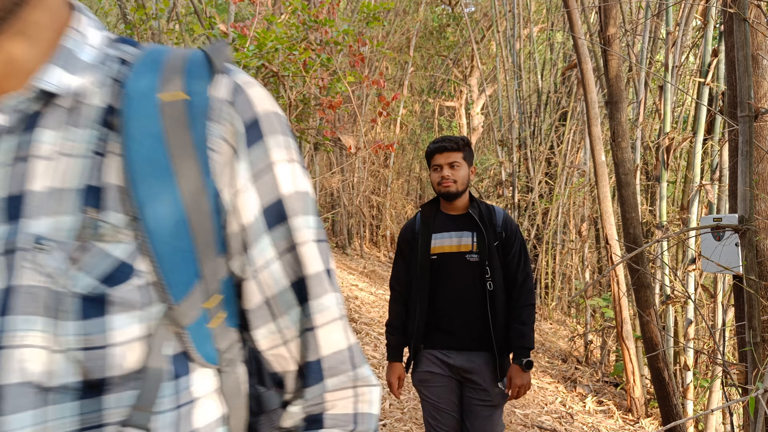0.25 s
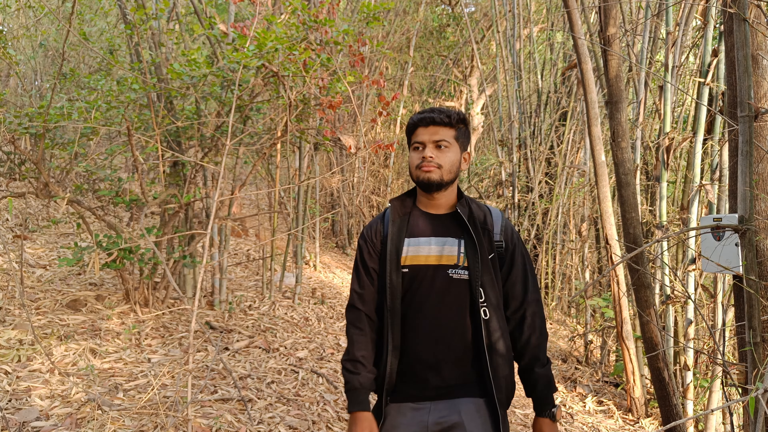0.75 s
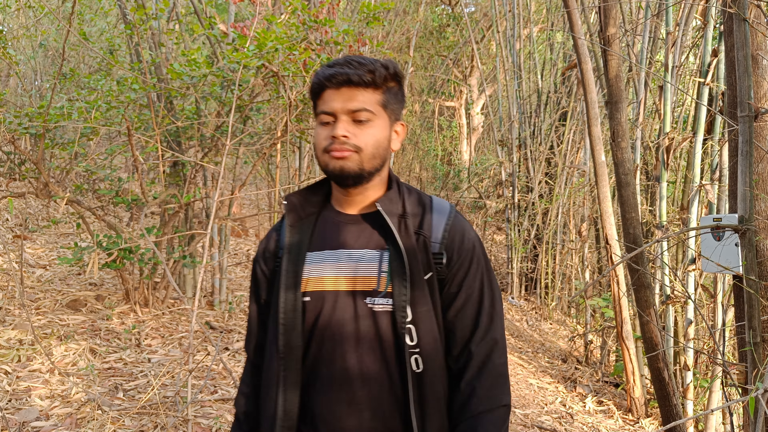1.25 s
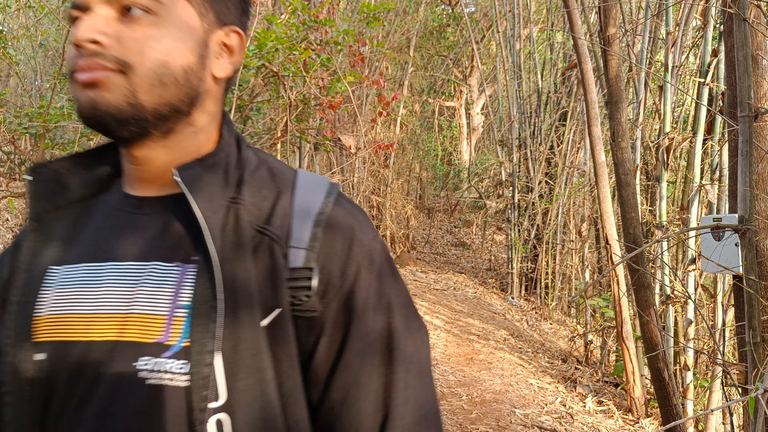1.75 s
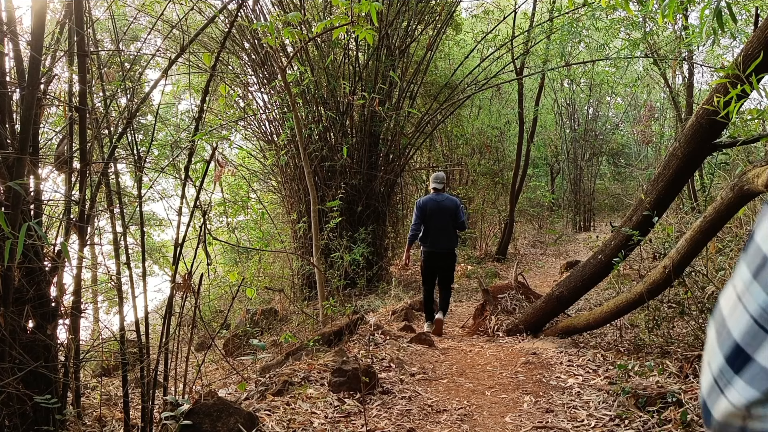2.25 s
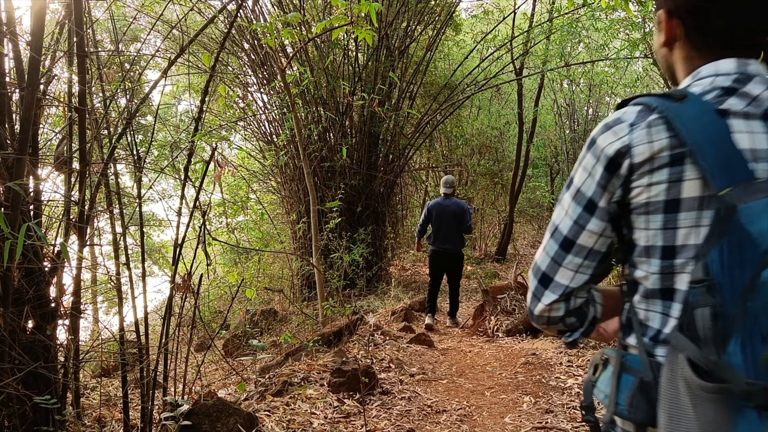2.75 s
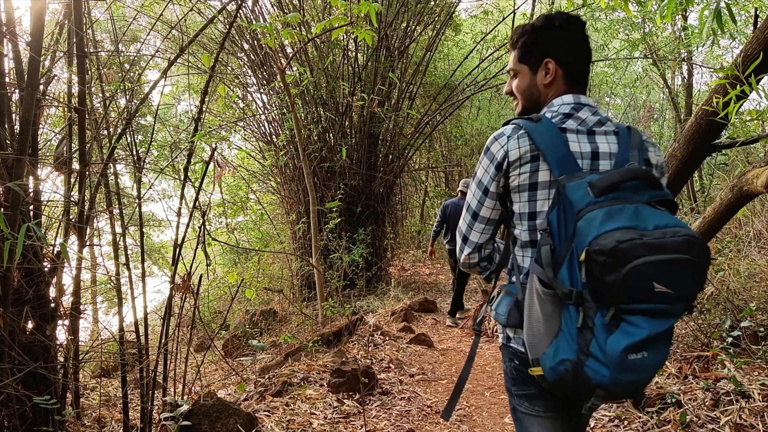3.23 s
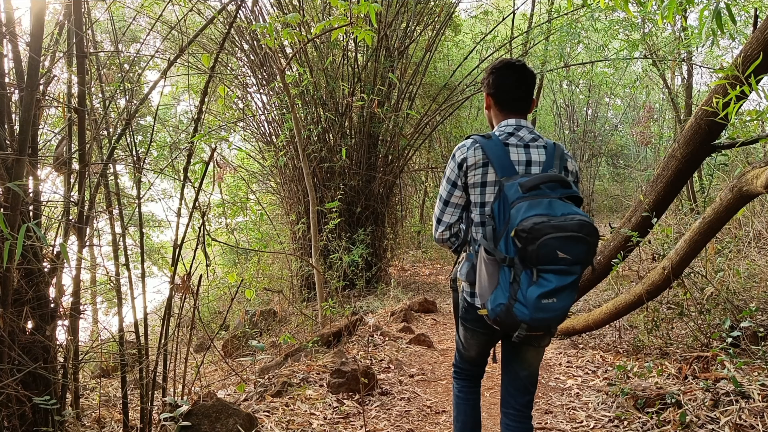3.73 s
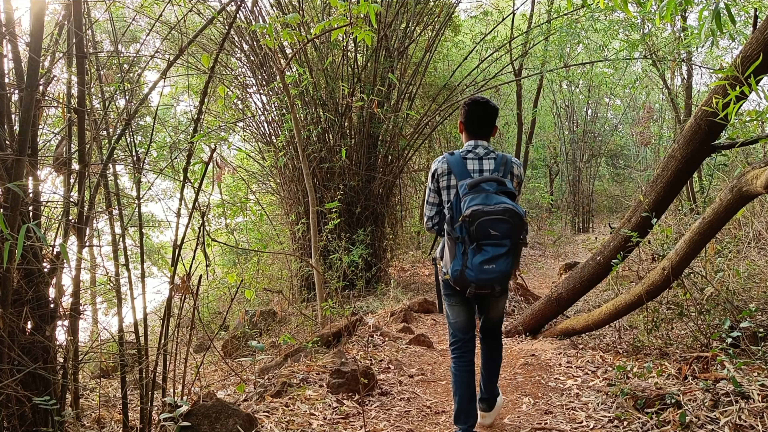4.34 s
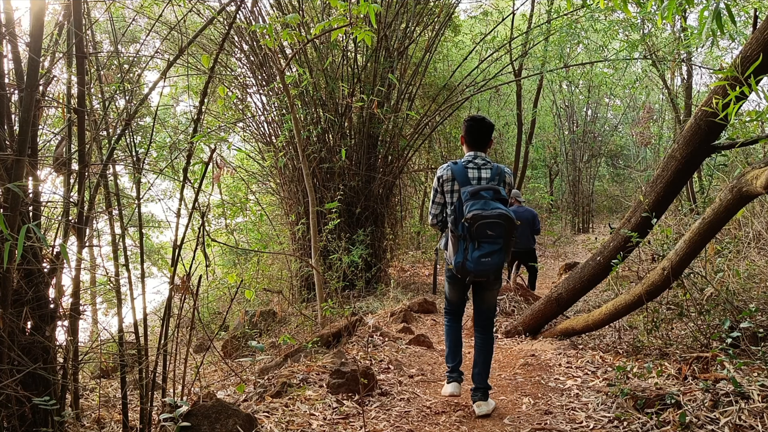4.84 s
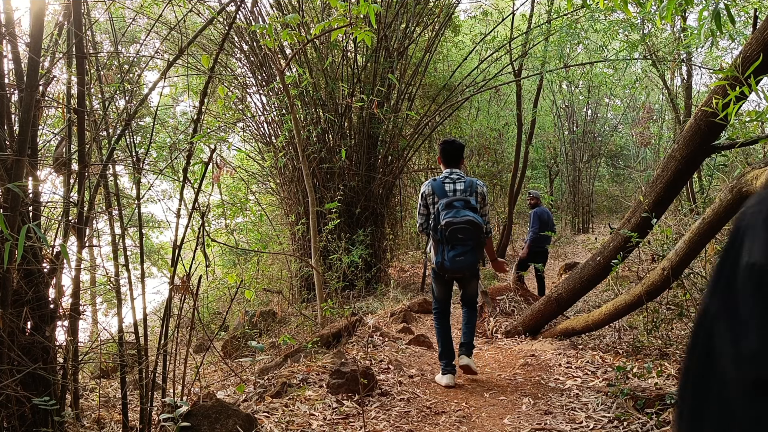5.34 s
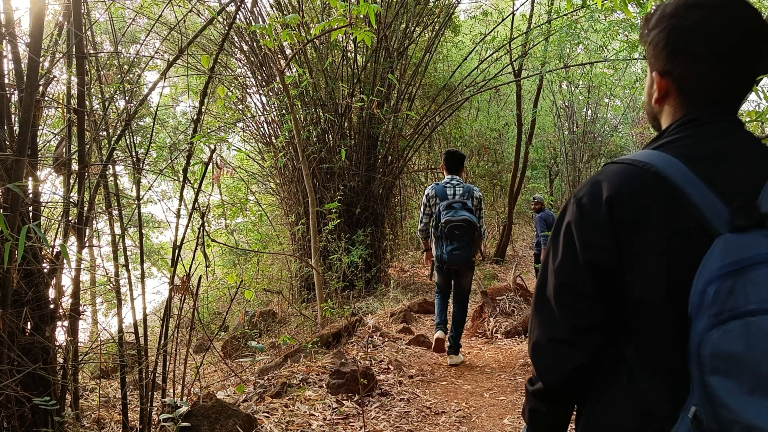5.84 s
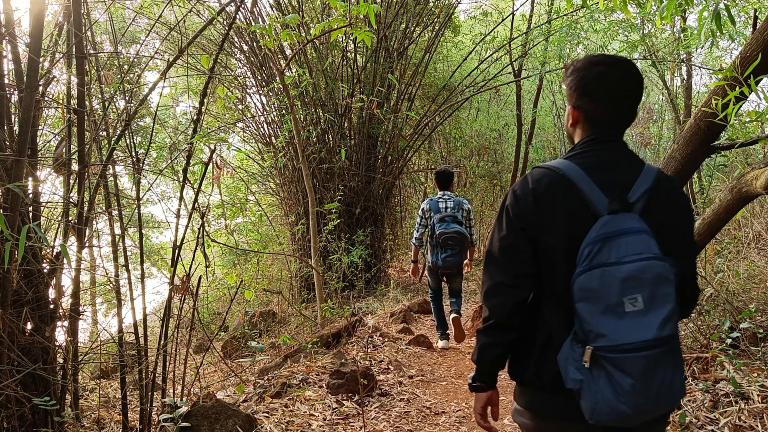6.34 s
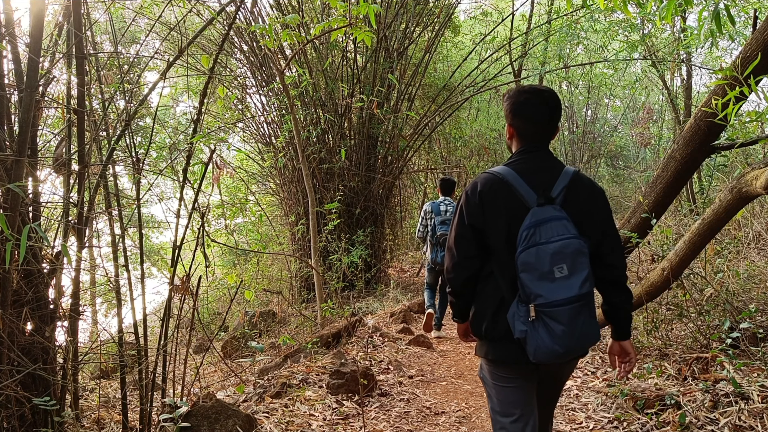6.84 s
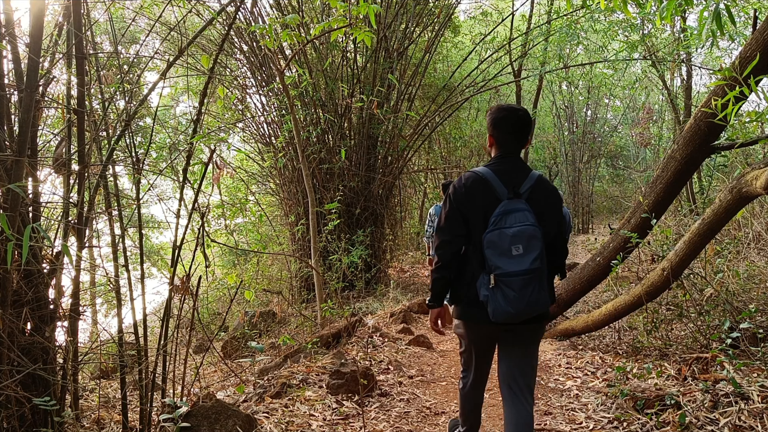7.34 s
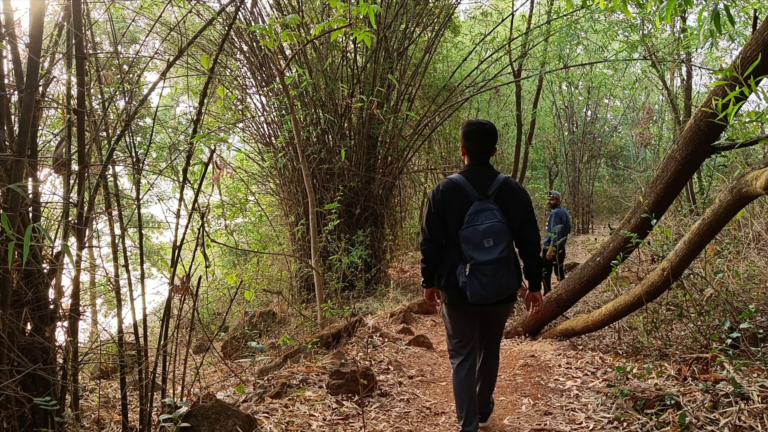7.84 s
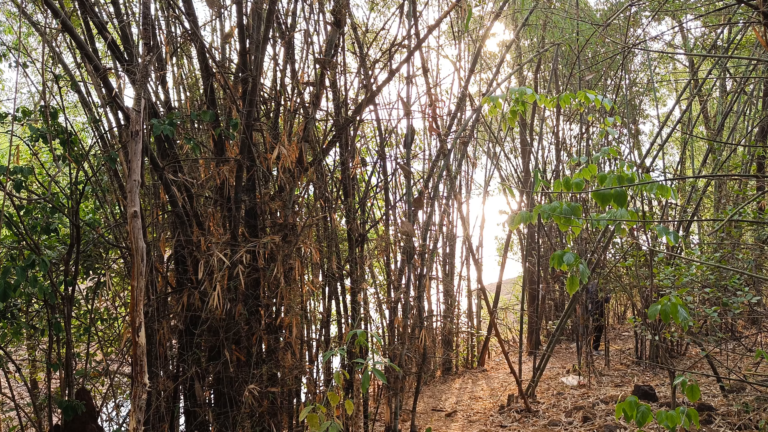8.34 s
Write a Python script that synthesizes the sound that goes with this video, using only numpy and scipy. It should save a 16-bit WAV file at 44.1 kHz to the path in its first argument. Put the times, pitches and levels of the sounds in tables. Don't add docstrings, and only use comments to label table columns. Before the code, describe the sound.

Many woodland birds whistle, trill and chirp, mostly on the left, while feet thud and scuff through dry leaves over soft leaf hiss.

```python
import sys
import numpy as np
from scipy import signal
from scipy.io import wavfile
from scipy.ndimage import uniform_filter1d

SR = 44100
rng = np.random.default_rng(int(sys.argv[2]) if len(sys.argv) > 2 else 0)


def int16_out(signal):
    q = np.round(np.clip(np.atleast_2d(signal).T, -1, 1) * 32767)
    wavfile.write(sys.argv[1], SR, q.astype(np.int16))


def rack_gain(trim_db):
    fader = np.asarray(trim_db, float)
    return 10 ** (fader / 20)


N = 378378


def evened(x):
    return x / np.sqrt(np.mean(x ** 2) + 1e-20)


def drift(count, size):
    once = uniform_filter1d(rng.standard_normal(count), size=size)
    return evened(uniform_filter1d(once, size=size))


def read(points, hz):
    f, value = np.transpose(points)
    return np.interp(np.log(hz + 1), np.log(f + 1), value)


def curve(rows, axis=1):
    rows = np.array(rows)
    return np.interp(np.arange(N) / SR, rows[:, 0], rows[:, axis])


def add(mix, s, sound):
    part = mix[..., max(round(s * SR), 0):][..., :sound.shape[-1]]
    part += sound[..., :part.shape[-1]]


def sides(db):
    return rack_gain([[db], [-db]])


def placed(x, pan_db, lag):
    left = x * rack_gain(pan_db / 2)
    right = np.roll(x, round(lag)) * rack_gain(-pan_db / 2)
    return np.array([left, right])


def bursts(rows, taper, skew=1):
    out = np.zeros((len(rows[0]) - 2, N))
    for s, length, *db in rows:
        u = np.linspace(0, 1, int(length * SR))
        shape = np.interp(u ** skew, u, signal.windows.tukey(len(u), taper))
        add(out, s, rack_gain(np.array(db))[:, None] * shape)
    return out


def hiss(spectrum, patchy_db, flicker_db):
    # (frequency [Hz], correlation [-1 to 1])
    likeness = [(100, 0.6), (600, 0.53), (1400, 0.49), (3000, -0.15), (15000, 0.18)]
    frames, hz = N // 128 + 5, np.fft.rfftfreq(512, 1 / SR)
    a, b, c, d, patches = rng.standard_normal((frames, 257, 5)).T
    patches = uniform_filter1d(patches, size=6, axis=0)
    patches = evened(uniform_filter1d(patches, size=16, axis=1))
    flicker = evened(uniform_filter1d(rng.standard_normal(frames), size=5))
    shared = read(likeness, hz)[:, None]
    left = a + 1j * b
    right = shared * left + np.sqrt(1 - shared ** 2) * (c + 1j * d)
    patch_level = patchy_db * patches / (1 + (hz[:, None] / 5000) ** 2)
    z = np.array([left, right]) * rack_gain(read(spectrum, hz)[:, None] + patch_level + flicker_db * flicker)
    return evened(signal.istft(z, nperseg=512, noverlap=384)[1][:, :N])


def note(length, start_hz, middle_hz, end_hz, db, flutter_db=8.0, wobble=0):
    u = np.arange(int(length * SR)) / (length * SR)
    hz = start_hz * (1 - u) * (1 - 2 * u) + 4 * middle_hz * u * (1 - u) + end_hz * u * (2 * u - 1)
    flutter = drift(len(u), 90)
    flutter = evened(flutter - flutter.mean())
    edge = np.minimum(np.minimum(u, 1 - u) * length / (0.0028 + 0.031 * length), 1)
    turns = np.cumsum(hz * (1 + wobble * flutter[::-1])) / SR
    return rack_gain(db + flutter_db * flutter) * np.sqrt(2) * edge * np.sin(2 * np.pi * turns)


def warbler():
    # (offset [s], length [s], start [Hz], middle [Hz], end [Hz], level [dB])
    slow_phrase = [
        (-.062, 0.0112, 4620, 5020, 5400, -12.5),
        (-.053, 0.024, 5310, 5430, 5300, -16),
        (-.047, 0.0147, 3890, 4240, 4600, -9),
        (-.032, 0.019, 4570, 4470, 4300, -11.5),
        (-.019, 0.012, 4280, 3720, 3770, -3.5),
        (-.001, 0.0274, 3025, 3400, 3750, -4),
        (.026, .013, 3500, 3250, 3200, -4),
        (.037, 0.0198, 3160, 2782, 2710, -11),
        (.015, 0.028, 4500, 4470, 4330, -16.5),
    ]
    quick_phrase = [
        (-.075, 0.027, 3100, 3470, 4120, -5.5),
        (-.052, 0.0376, 4093, 4270, 4240, -2),
        (-.019, 0.014, 4300, 4760, 4960, -4.5),
        (-.013, 0.0121, 4000, 3240, 2500, 1.5),
        (-.05, 0.039, 3900, 4037, 4000, -4.5),
        (-.002, .017, 3060, 3480, 3720, 3.5),
        (.015, 0.015, 3520, 3298, 3090, 3.5),
        (.027, .021, 2900, 2440, 2000, -5),
    ]
    # (time [s], level [dB], stretch [ratio], pitch [ratio])
    slow_sung = [
        (1.011, -32, 0.95, 1.02),
        (2.666, -30.5, 0.94, 1.025),
        (4.385, -31, 1.05, 1.015),
        (6.25, -31, 0.98, .995),
        (7.175, -31, 1.14, 0.98),
    ]
    quick_sung = [
        (0.343, -38.5, 0.96, 1.045),
        (1.822, -38.5, 0.89, 1.005),
        (3.65, -37, 0.88, 1.04),
        (5.467, -38, .98, 1.01),
        (7.977, -37, 0.96, 1.014),
    ]
    out = np.zeros(N)
    for phrase, sung in (slow_phrase, slow_sung), (quick_phrase, quick_sung):
        for s, sung_db, stretch, pitch in sung:
            for offset, length, *hz, db in phrase:
                sound = note(length * stretch, *np.multiply(hz, pitch), db + sung_db,
                             flutter_db=3.5, wobble=0.009)
                add(out, s + offset * stretch, sound)
    return out


def falling_chips():
    # (time [s], start [Hz], end [Hz], level [dB])
    lone = [(4.035, 3880, 3540, -51), (4.15, 4500, 3180, -46.5), (4.197, 3460, 2800, -45.5),
            (4.267, 3950, 3200, -49), (4.425, 3130, 1980, -48), (5.3, 4040, 3400, -51),
            (5.341, 3380, 2260, -40.5), (1.99, 4300, 3650, -51), (2.341, 4100, 3460, -50),
            (4.003, 3300, 2900, -65), (4.123, 4390, 3910, -52), (5.2, 3670, 2850, -56),
            (0.011, 3560, 2550, -46.5), (4.596, 3400, 2310, -40.5)]
    # (first [s], last [s], mean gap [s], slowing [0-1], level [dB])
    trills = [(1.25, 1.769, .052, 0.04, -47.5), (1.933, 2.058, .056, 0.26, -51),
              (2.117, 2.758, .07, 0.05, -48), (3.757, 4.215, .116, 0, -48),
              (4.74, 5.026, .141, 0.01, -36.5), (6.368, 6.838, .079, 0.15, -50),
              (7.356, 8.073, .18, 0.05, -50), (8.21, 8.506, .075, 0, -46.5), (3.888, 4.241, .116, 0, -58)]
    # (start [Hz], end [Hz], length [s])
    trill_chips = [(4550, 3650, 0.0204), (4500, 3900, 0.0208), (3200, 2200, 0.0187), (5800, 4600, 0.014),
                   (3200, 2300, 0.03), (4000, 2500, 0.025), (3255, 2600, 0.023), (4100, 3300, 0.0237),
                   (3400, 2900, 0.016)]
    shy_start_db, uneven_db = -3, 1.2
    rows = [(s, start_hz, end_hz, .025, db) for s, start_hz, end_hz, db in lone]
    for (first, last, gap, slowing, db), chip in zip(trills, trill_chips):
        for u in np.linspace(0, 1, round((last - first) / gap) + 1):
            s = first + (last - first) * (u - slowing * u * (1 - u))
            chip_db = db + shy_start_db * (1 - u) ** 3 + uneven_db * rng.standard_normal()
            rows.append((s, *chip, chip_db))
    out = np.zeros(N)
    for s, start_hz, end_hz, length, db in rows:
        add(out, s, note(length, start_hz, .48 * (start_hz + end_hz), end_hz, db, flutter_db=3.5))
    return placed(out, 7.9, 9.2) * rack_gain(5.5)


def thin_calls():
    # (length [s], start [Hz], middle [Hz], end [Hz])
    seep = (.03, 7520, 7610, 7270)
    # (first [s], last [s], level [dB])
    series = [(0.587, 1.134, -51), (1.686, 2.0966, -51), (2.7841, 3.198, -51), (3.742, 4.157, -51.5),
              (4.842, 5.404, -50.5), (5.813, 6.231, -50.5), (6.774, 7.189, -51), (7.747, 8.294, -51.5)]
    gap_s, hurry, settle = .138, 0.074, 0.22
    out = np.zeros(N)
    for first, last, db in series:
        gaps = 1 - hurry * settle ** np.arange(round((last - first) / gap_s))
        steps = np.cumsum(np.r_[0, gaps])
        for s in first + (last - first) * steps / steps[-1]:
            add(out, s - .004, note(*seep, db - 3.0, flutter_db=2.5))
    add(out, .0368 - .004, note(*seep, -52.5, flutter_db=1.0))
    return placed(out, 8.4, 5.2) * rack_gain(2.0)


def whistles(rows, flutter_db):
    out = np.zeros(N)
    for s, length, start_hz, end_hz, db in rows:
        middle_hz = (start_hz + end_hz) / 2
        add(out, s - .003, note(length + 0.00716, start_hz, middle_hz, end_hz, db, flutter_db=flutter_db))
    return out


def arches():
    # (time [s], length [s], pitch [Hz], level [dB])
    calls = [(5.613, 0.025, 1084, -52), (5.702, 0.021, 1090, -57), (6.268, 0.031, 1130, -48.5),
             (6.369, 0.028, 986, -53), (6.686, 0.022, 1136, -47), (7.107, 0.025, 1000, -43.5),
             (7.595, 0.0234, 1057, -49.5), (7.66, 0.028, 1026, -51), (8.12, 0.029, 1040, -50.5)]
    out = np.zeros(N)
    for s, length, hz, db in calls:
        for k in range(4, 9):
            beak_db = -7 * ((k * hz - 6000) / 1000) ** 2
            add(out, s, note(length, .86 * k * hz, k * hz, .93 * k * hz, db + beak_db, flutter_db=3))
    return out


def riser():
    # (time [s], pitch [Hz], level [dB])
    climb = [
        (1.2, 2050, -48),
        (1.258, 2126, -51),
        (1.322, 2300, -42.5),
        (1.35, 2383, -37.5),
        (1.39, 2560, -37.5),
        (1.42, 2720, -43),
        (1.437, 2750, -60),
    ]
    t = np.arange(N) / SR
    level = rack_gain(curve(climb, axis=2) + 0.83 * drift(N, 150))
    sounding = (t > climb[0][0]) & (t < climb[-1][0])
    return np.sqrt(2) * level * sounding * np.sin(2 * np.pi * np.cumsum(curve(climb)) / SR)


def left_birds():
    # (time [s], length [s], start [Hz], end [Hz], level [dB])
    glides = [(.29, 0.066, 2300, 2200, -54), (.39, 0.045, 2250, 2750, -54), (.44, 0.06, 2800, 2880, -56),
              (.872, 0.055, 2330, 1980, -51.5), (2.948, 0.017, 3320, 3730, -51),
              (2.966, 0.018, 3670, 4800, -56), (2.983, .012, 3600, 4220, -59),
              (3.455, 0.029, 4100, 3630, -48), (3.488, 0.011, 3000, 3550, -48.5),
              (3.562, 0.034, 5400, 6100, -52), (4.47, 0.18, 3410, 3380, -52), (4.65, 0.14, 3390, 3370, -56),
              (5.118, 0.02, 2280, 2140, -47.5), (5.144, 0.02, 2910, 2560, -45),
              (5.274, 0.027, 2090, 4000, -51.5), (5.667, 0.015, 3720, 5060, -48),
              (5.684, 0.013, 4700, 3320, -57), (5.73, 0.041, 3050, 3520, -53),
              (5.375, 0.082, 2940, 2750, -50), (2.57, .015, 1610, 2510, -52),
              (5.045, 0.021, 2300, 2300, -55), (3.93, 0.029, 3690, 3690, -52.5)]
    faint = [(1.0, 0.079, 4500, 4500, -53), (7.169, 0.072, 4440, 4420, -50),
             (7.24, 0.055, 4430, 4350, -52.5), (5.484, 0.02, 3300, 3280, -55),
             (0.014, 0.062, 4360, 3960, -54), (5.792, 0.017, 3760, 4540, -49),
             (5.242, 0.031, 5340, 5180, -51.5), (6.097, 0.037, 4260, 4520, -56),
             (0.27, 0.04, 4800, 4800, -53), (0.472, 0.0085, 4280, 5460, -50),
             (8.245, .025, 4360, 4510, -52), (5.755, .025, 3320, 2500, -56), (0.83, .02, 4800, 5600, -57),
             (1.705, 0.012, 3250, 3100, -47), (1.732, .012, 3250, 3100, -46),
             (2.133, 0.016, 5700, 4600, -51), (2.152, 0.011, 5200, 4470, -61),
             (3.91, 0.012, 5500, 3900, -58), (4.54, 0.064, 4100, 4125, -55),
             (4.699, 0.041, 4800, 4670, -52), (4.786, 0.14, 3723, 3750, -50),
             (4.951, 0.16, 3780, 3736, -51), (5.38, .015, 5900, 6300, -56), (5.59, 0.029, 6260, 6870, -55),
             (6.442, 0.025, 4670, 4550, -51), (6.991, 0.016, 4910, 4790, -49), (7, 0.018, 4700, 4000, -47),
             (7.31, 0.016, 3800, 3720, -52), (7.48, .03, 3780, 3770, -57), (7.552, 0.01, 4000, 4770, -50),
             (7.554, 0.0096, 4000, 3550, -51), (7.607, 0.019, 3060, 3600, -55),
             (7.678, 0.024, 3090, 3470, -52), (8.049, 0.019, 5260, 5900, -49),
             (8.547, 0.014, 6150, 6380, -48.5)]
    # (time [s], pitch [Hz], level [dB])
    pips = [(1.806, 4800, -51), (3.594, 4120, -47), (6.283, 5750, -46), (6.761, 5800, -54),
            (7.21, 5760, -52), (7.661, 3830, -53), (7.836, 3770, -53), (7.875, 3340, -50),
            (7.961, 4400, -47.5)]
    # (time [s], length [s], top [Hz], level [dB])
    hooks = [
        (2.866, .022, 3320, -48),
        (2.892, 0.019, 3280, -48),
        (6.14, 0.0257, 3400, -47.5),
        (6.168, .022, 3360, -50),
    ]
    out = whistles(glides, 2.7) + arches() + riser()
    level_pips = [(s, 0.022, hz, hz, db) for s, hz, db in pips]
    out += whistles(level_pips, 3.2) + whistles(faint, 3.2)
    for s, length, top_hz, db in hooks:
        add(out, s, note(length, .95 * top_hz, top_hz, 0.81 * top_hz, db, flutter_db=0.0))
    return out


def ahead_birds():
    # (time [s], length [s], start [Hz], end [Hz], level [dB])
    glides = [(.645, 0.068, 1917, 1897, -47), (1.189, 0.13, 2013, 1945, -44.5),
              (7.35, 0.057, 3020, 2130, -60), (7.73, 0.21, 1980, 1853, -48), (7.705, 0.17, 2296, 2170, -48),
              (1.962, .048, 2500, 2400, -42), (2.008, 0.061, 2370, 1790, -44.5),
              (6.02, .025, 3650, 2900, -53), (6.045, .05, 2880, 2400, -60), (6.39, 0.16, 2420, 2280, -52),
              (8.1, 0.078, 2570, 2560, -50)]
    return placed(whistles(glides, 4.2), 1.5, 7.8) * rack_gain(-2.0)


def right_birds():
    # (time [s], length [s], start [Hz], end [Hz], level [dB])
    glides = [(.55, 0.082, 1963, 1880, -55), (.762, 0.027, 1880, 2010, -55), (.808, 0.053, 1880, 1900, -59),
              (.812, 0.031, 2020, 2073, -56), (.93, 0.043, 2120, 2044, -49.5),
              (1.345, 0.049, 1960, 2110, -53), (1.662, 0.032, 1977, 1894, -56.5),
              (1.965, 0.0456, 2250, 1814, -51), (2.706, 0.101, 2020, 1842, -51),
              (6.417, 0.059, 5400, 5400, -59.5), (6.63, 0.056, 5350, 5400, -60),
              (7.5, 0.16, 2217, 2325, -53)]
    return placed(whistles(glides, 3.9), -10.0, -7.5) * rack_gain(1.0)


def squeak():
    # (time [s], pitch [Hz], level [dB])
    arch = [
        (4.878, 947, -44),
        (4.89, 1140, -42),
        (4.905, 1217, -38.5),
        (4.922, 1237, -38.5),
        (4.94, 1210, -40),
        (4.953, 1120, -38.5),
        (4.964, 940, -43),
    ]
    # (multiple of pitch, level [dB])
    overtones = [(2, -16), (3, -20), (4, 2), (5, 1), (6, -7), (7, -10), (8, -17), (9, -13), (10, -24),
                 (11, -28), (12, -25)]
    start, end = arch[0][0], arch[-1][0]
    turns = (np.cumsum(curve(arch)) / SR)[int(start * SR):int(end * SR)]
    out = np.zeros(N)
    for k, db in overtones:
        rasp_db = 2.5 * drift(len(turns), 50)
        dulling_db = 1.4 * k * np.linspace(0, 1, len(turns)) ** 2
        wave = np.cos(2 * np.pi * (k * turns + rng.random()))
        add(out, start, rack_gain(db + rasp_db - dulling_db) * wave)
    return placed(rack_gain(curve(arch, axis=2)) * out, -11.5, -2)


def trees(x, t60=0.43):
    taps = np.zeros((2, SR // 2))
    slots = np.arange(150, SR // 2 - 20, 20)
    at = slots + rng.integers(0, 20, (2, len(slots)))
    np.put_along_axis(taps, at, rng.choice([-1., 1.], at.shape), 1)
    taps *= rack_gain(-60 * np.arange(SR // 2) / SR / t60)
    return signal.fftconvolve(x[None], taps / np.linalg.norm(taps[0]), axes=1)[:, :N]


def feet():
    # (time [s], peak [dB], pitch [Hz])
    thuds = [(0.089, -42, 760), (0.188, -52, 1060), (0.238, -39.5, 965), (1.306, -42, 1100),
             (1.359, -47, 396), (1.552, -46.5, 365), (1.768, -39.5, 813), (2.214, -39.5, 600),
             (2.357, -43.5, 825), (4.534, -42, 764), (5.054, -39, 353), (5.231, -44.5, 480),
             (6.015, -43, 898), (7.61, -49, 600), (7.841, -47.5, 400), (0.061, -41, 1040), (0.09, -50, 310),
             (0.633, -50, 314), (1.728, -48, 420), (2.242, -40.5, 580), (.631, -43, 675),
             (0.9027, -46, 530), (1.309, -41, 1840), (4.369, -57, 655), (4.565, -45, 551),
             (5.553, -49, 700), (6.427, -53, 940), (7.107, -51, 470), (8.226, -50.5, 410)]
    # (time [s], length [s], hiss [dB], body [dB])
    scuffs = [
        (.087, 0.058, -48, -43),
        (.13, 0.3, -47.5, -48.5),
        (.628, 0.051, -53, -42),
        (.85, 0.16, -55, -50.5),
        (1.52, 0.059, -58, -51),
        (1.86, 0.19, -45.5, -51.5),
        (2.203, 0.04, -38.5, -45),
        (2.228, 0.06, -39.5, -46),
        (2.3, 0.61, -63.5, -55),
    ]
    # (frequency [Hz], density [dB per Hz])
    crisp = [(1180, -48), (2000, -6), (3400, 6.5), (5540, -3), (6940, 0.5), (15700, -2), (16100, -40)]
    dull = [(200, -25.0), (500, -1.5), (1100, -2.5), (2500, -12.5), (6000, -44)]  # (Hz, dB per Hz)
    t, knocks = np.arange(2000) / SR, np.zeros(N)
    for s, db, hz in thuds:
        knock = np.sin(2 * np.pi * hz * t) + 0.13 * drift(len(t), 16)
        add(knocks, s, rack_gain(db + 4.0) * knock * np.exp(-t * hz / 5.1) * (1 - np.exp(-t * hz / 0.4)))
    knocks = signal.sosfilt(signal.butter(3, 200, "high", fs=SR, output="sos"), knocks)
    top, body = bursts(scuffs, 0.79, skew=0.63)
    scuffing = top * hiss(crisp, 3.4, 3.8) * sides(1.5) + body * hiss(dull, 4.4, 2.1)
    return placed(knocks, .5, 1.2) + scuffing


def snaps():
    # (time [s], peak [dB], pitch [Hz], left-right [dB])
    breaks = [
        (.9058, -27.5, 2700, 6),
        (1.7695, -38, 325, 0),
        (1.912, -42, 1500, 0),
        (5.339, -38, 1674, -1),
    ]
    out = np.zeros((2, N))
    for s, db, hz, pan_db in breaks:
        u = np.arange(-2, 6, hz / SR)
        push = np.exp(-(1.94 * u) ** 2) * np.sin(2 * np.pi * u)
        push += .3 * np.exp(-(1.5 * (u - 1.6)) ** 2) * np.sin(2.6 * np.pi * u)
        add(out, s - 2 / hz, rack_gain(db + 1) * sides(pan_db / 2) * -push)
    return out


def drips(per_s=70):
    # (time [s], peak [dB], left-right [dB])
    clear = [(0.09, -38, 20), (0.2848, -30, 14), (0.3887, -39, -5.0), (0.406, -29.5, 0), (.036, -42, 7),
             (.124, -43, 5), (.674, -45, 0), (.696, -43, 0), (.577, -44, 0), (.9055, -42, 5),
             (1.2451, -31.5, 3), (.2698, -36, 7), (2.061, -41, 0.5), (3.041, -37, 0.5), (3.111, -38, -3),
             (3.276, -40, 3), (6.1325, -40, -4), (6.573, -34, 13), (8.317, -36, 0.5), (8.4188, -31.5, 5),
             (2.2103, -34, 11), (2.5336, -39, 0.5), (2.6479, -34, 0.5), (2.6845, -33, -1.5),
             (4.1729, -34, -0.5), (4.267, -36, 0.5), (4.8718, -40, -4.0), (5.028, -31.5, -13),
             (5.328, -44, 17), (5.9209, -36, -1.0), (6.558, -40, 2), (6.8289, -45, -11), (6.8887, -45, -3),
             (7.034, -32, -1), (7.2409, -32, 1.5), (7.39, -36.5, -3), (7.5627, -37, -4.5), (7.748, -37, 3),
             (8.528, -31.5, 16)]
    t, out = np.arange(200) / SR, np.zeros((2, N))
    for s, db, pan_db in clear:
        hz = rng.uniform(4900, 9700)
        tick = np.sin(2 * np.pi * hz * t) * np.exp(-t / .00022) * (1 - np.exp(-t / .0001))
        add(out, s, rack_gain(db + 6) * sides(pan_db / 2) * tick)
    for hz in (5400, 6640, 7560, 9660):
        falls = rng.random((2, N)) < per_s / 4 / SR
        size = falls * rack_gain(-45 + 3.0 * np.minimum(rng.exponential(1, (2, N)), 4))
        tick = np.sin(2 * np.pi * hz * t) * np.exp(-t / 0.00026)
        out += signal.oaconvolve(size, tick[None])[:, :N]
    return out


def flock(level, low_hz, span_hz, per_s, wet):
    out = np.zeros((2, N))
    for when, pitch, glide, long, size, side in rng.random((1500, 6))[:int(per_s * N / SR)]:
        hz = low_hz + span_hz * pitch ** 1.3
        start_hz, end_hz = hz * (1.12 - 0.232 * glide), hz * (0.815 + 0.294 * glide)
        chirp = note(.01 + .02 * long, start_hz, hz * 1.03, end_hz, -8 * size, flutter_db=5.0)
        add(out[int(side > .75)], when * N / SR, chirp)
    blur = wet * trees(out.sum(0), t60=0.21) * sides(1.5)
    return level * evened(out + 0.19 * out[::-1] + blur)


def far_birds():
    # (time [s], level [dB])
    swell = [(0.0, -50), (2.2, -57.5), (3.0, -56), (3.85, -57.5), (4.2, -52.5), (4.73, -47.5), (5.2, -52),
             (6.05, -62.5), (6.33, -49), (6.81, -59), (7.77, -51), (8.58, -59.5)]
    # (time [s], length [s], level [dB])
    chatter = [(.94, 0.032, -49.5), (1.68, 0.13, -56), (2.6, 0.11, -63), (3.55, 0.075, -55),
               (4.3, 0.07, -68), (5.22, 0.091, -59), (5.36, 0.22, -54), (5.56, 0.098, -53),
               (6.17, 0.17, -51.5), (6.63, 0.21, -52.5), (6.97, 0.34, -53), (7.55, 0.33, -56.5),
               (7.86, 0.25, -55.5), (8.44, 0.47, -50)]
    chorus = flock(rack_gain(curve(swell) + 1.0), 3050, 1257.0, 110, wet=1.24)
    return chorus + flock(bursts(chatter, 0.61), 5000, 1985, 115, wet=0.83)


def air():
    # (frequency [Hz], density [dB per Hz])
    leaves = [(120, -17.5), (200, -25.5), (410, -1.5), (760, 1), (1400, -3), (1650, -6), (1940, -3),
              (3500, -0.5), (4500, -3), (5400, -8), (8000, -16), (11000, -19.5), (15500, -17.5),
              (15950, -36)]
    return rack_gain(-48.5) * sides(1.2) * hiss(leaves, 2.31, 1.0)


def rumble():
    # (frequency [Hz], density [dB per Hz])
    low = [(25, -27), (70, -12.5), (150, -11.5), (300, -8), (500, -21.5)]
    # (time [s], level [dB])
    course = [(0, -59), (2.27, -59.5), (2.29, -125), (8.08, -125), (8.14, -66), (8.58, -58)]
    return rack_gain(curve(course)) * hiss(low, 2.5, 1.0)


def scene():
    song, chips, left, nasal = warbler(), falling_chips(), left_birds(), squeak()
    birds = placed(left, 18.7, 5.26) * rack_gain(-5.5) + ahead_birds() + right_birds()
    birds += placed(song, 16.2, 8.8) * rack_gain(-9) + chips * rack_gain(-8)
    birds += rack_gain([[-10], [-13]]) * trees(song, t60=0.32)
    birds += rack_gain([[-13], [-17]]) * trees(song, t60=0.09)
    birds += rack_gain(-10) * trees(.3 * chips[0] + left * .5, t60=.1)
    echoes = rack_gain([[-2.5], [-6]]) * trees(birds.mean(0), t60=0.48)
    echoes += rack_gain(-8) * trees(nasal.mean(0), t60=.2)
    near = birds + thin_calls() + nasal + echoes + far_birds() + drips() + air() + feet()
    wind_filter = signal.butter(4, 150, "high", fs=SR, output="sos")
    return signal.sosfilt(wind_filter, near) + snaps() + rumble()


def roll_off(x):
    return signal.sosfilt(signal.butter(12, 15830, fs=SR, output="sos"), x)


def record(dry):
    return roll_off(dry)


dry = scene()
out = record(dry)
int16_out(out)
```